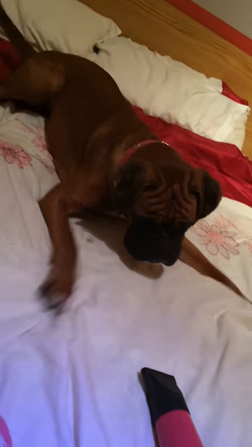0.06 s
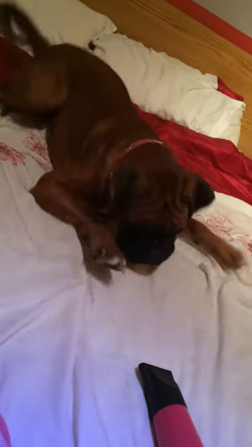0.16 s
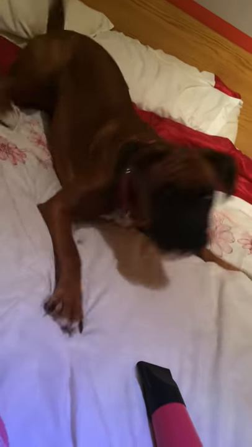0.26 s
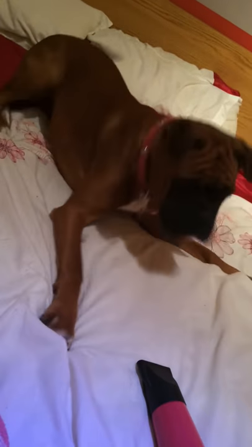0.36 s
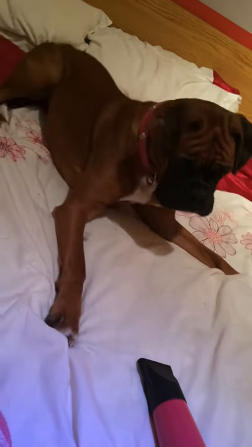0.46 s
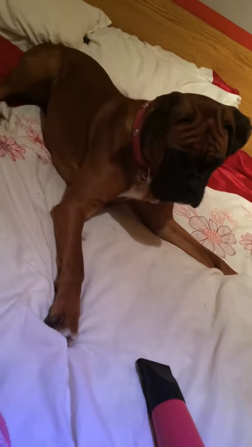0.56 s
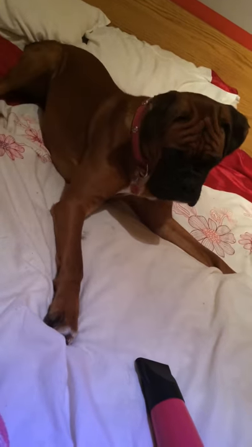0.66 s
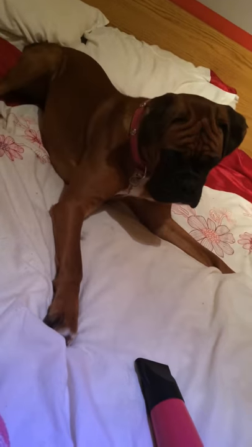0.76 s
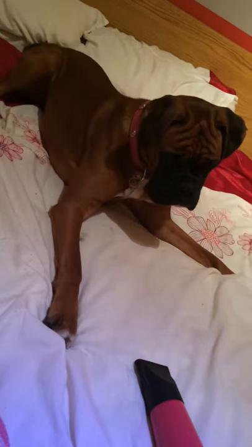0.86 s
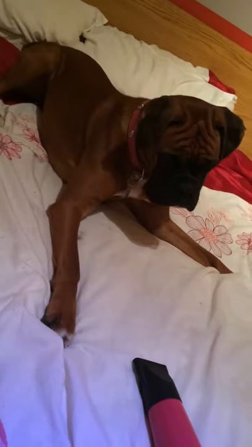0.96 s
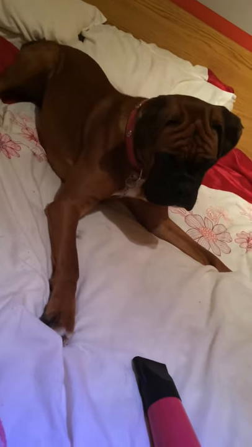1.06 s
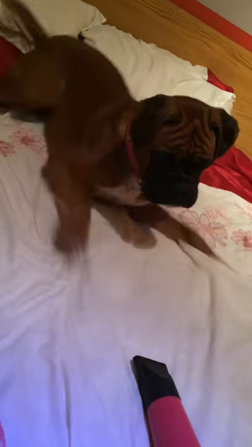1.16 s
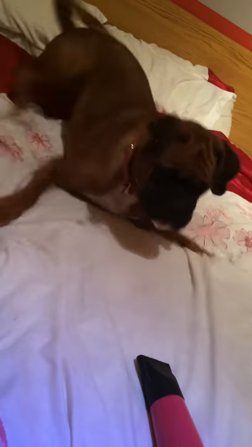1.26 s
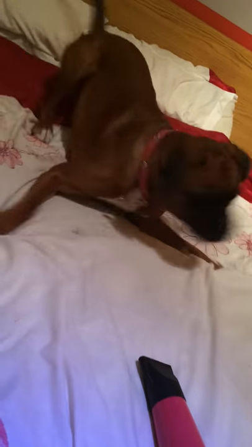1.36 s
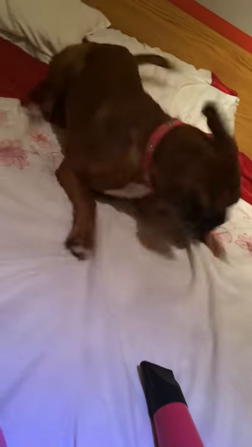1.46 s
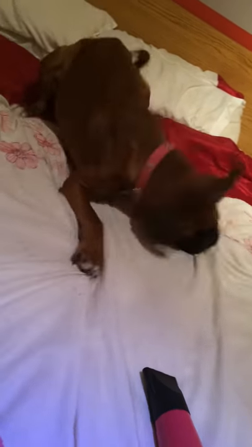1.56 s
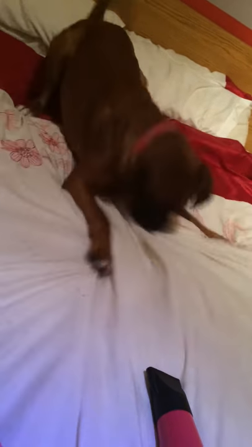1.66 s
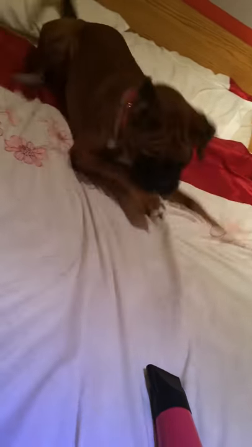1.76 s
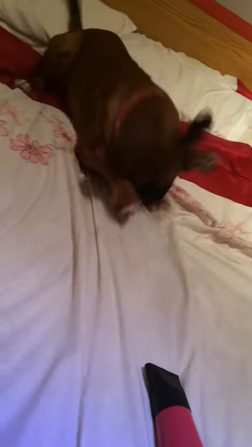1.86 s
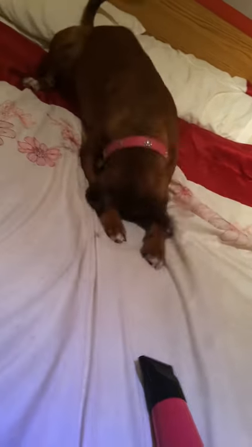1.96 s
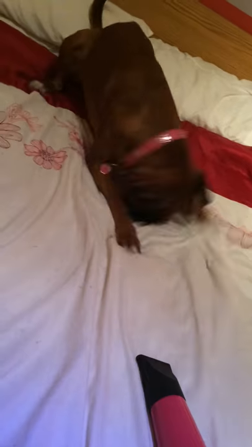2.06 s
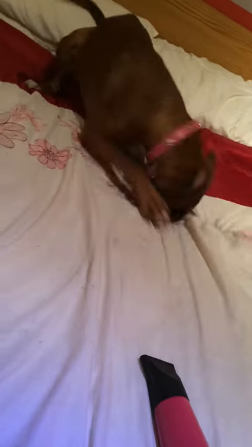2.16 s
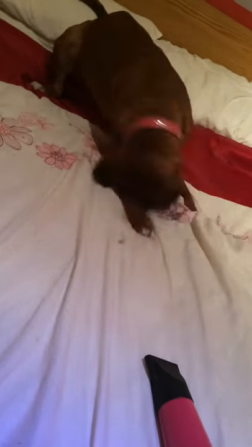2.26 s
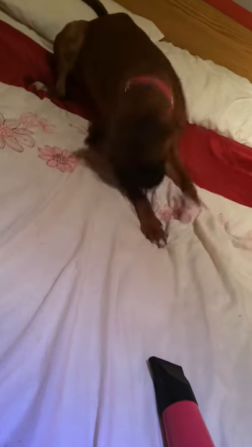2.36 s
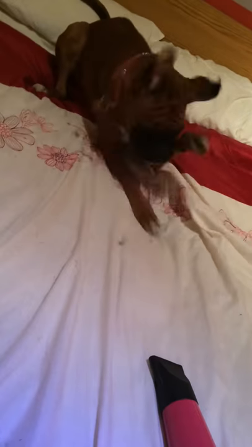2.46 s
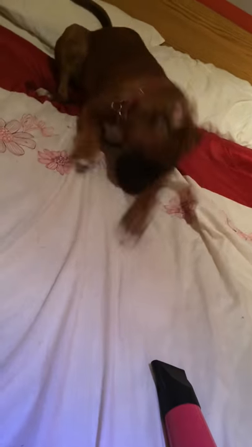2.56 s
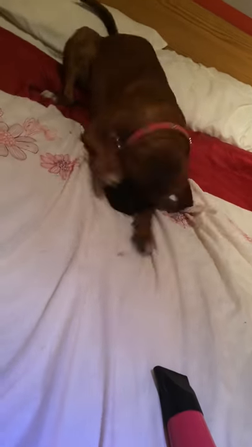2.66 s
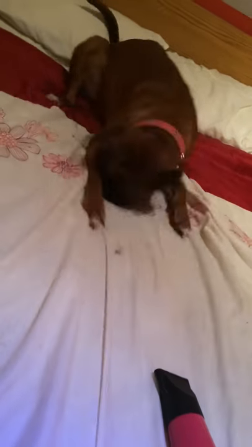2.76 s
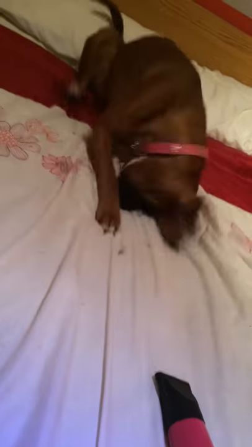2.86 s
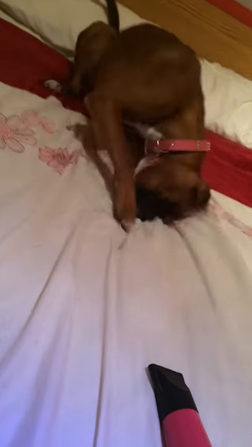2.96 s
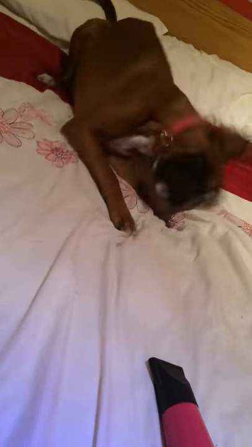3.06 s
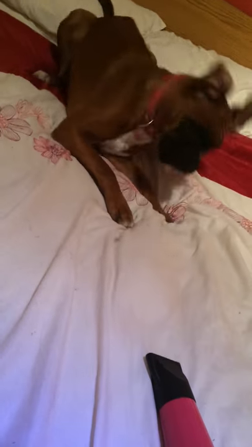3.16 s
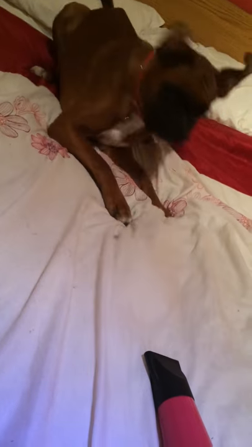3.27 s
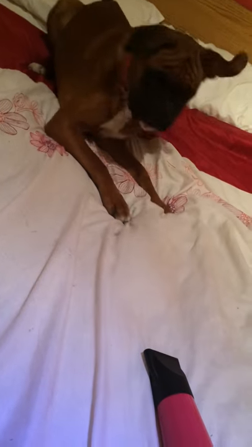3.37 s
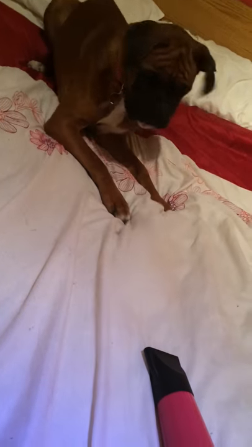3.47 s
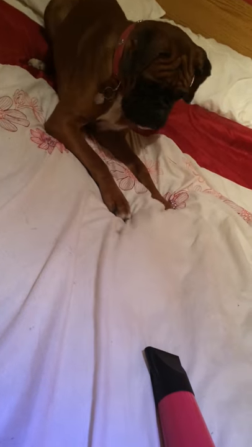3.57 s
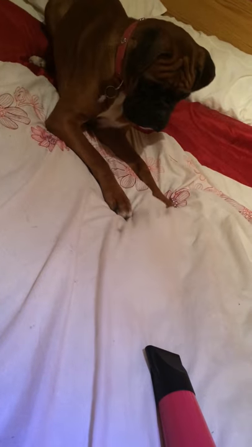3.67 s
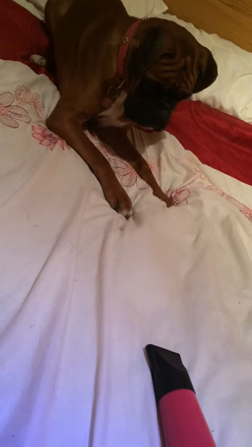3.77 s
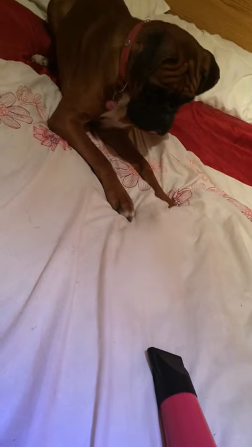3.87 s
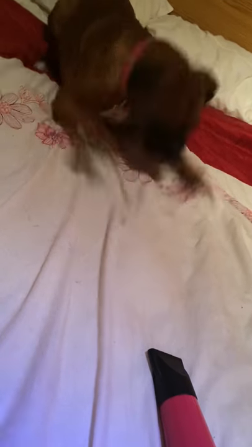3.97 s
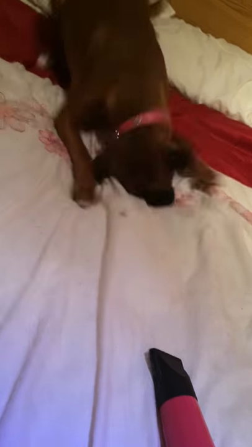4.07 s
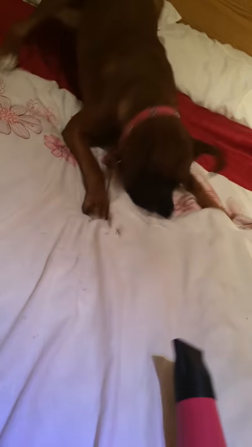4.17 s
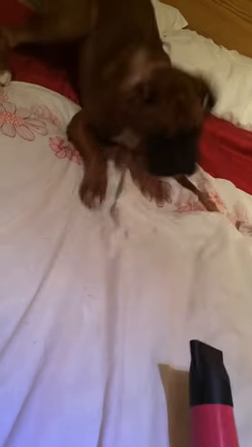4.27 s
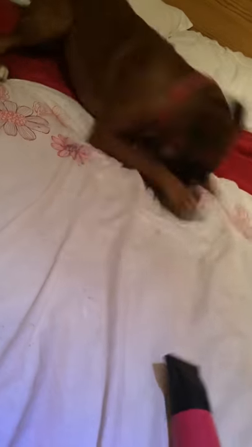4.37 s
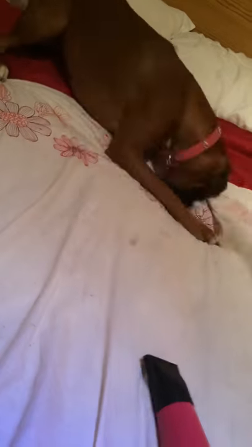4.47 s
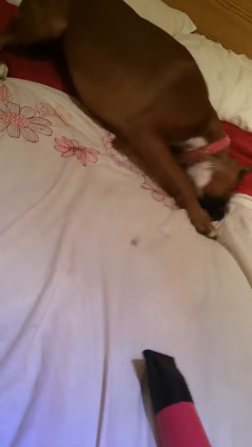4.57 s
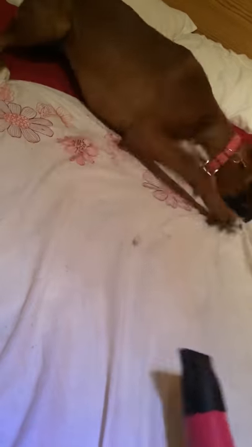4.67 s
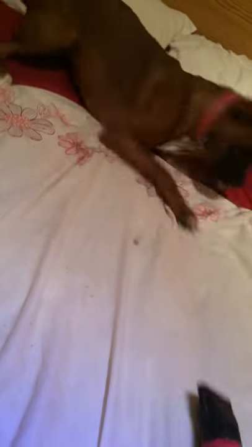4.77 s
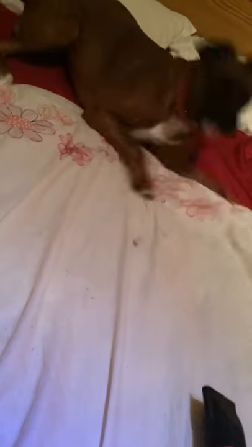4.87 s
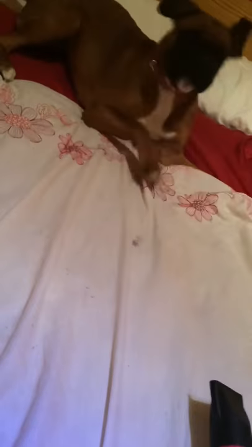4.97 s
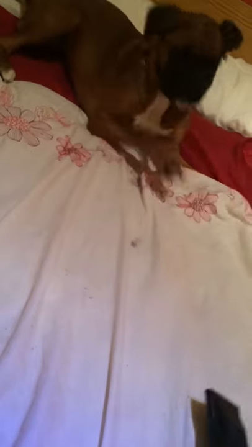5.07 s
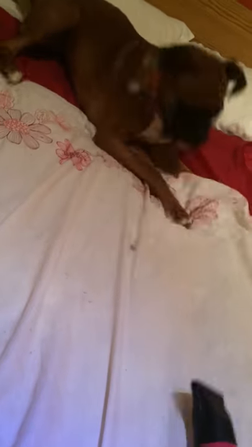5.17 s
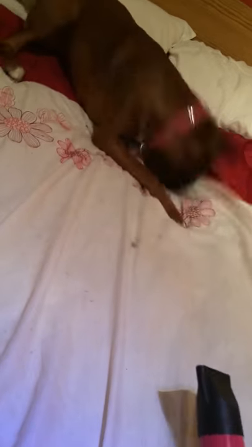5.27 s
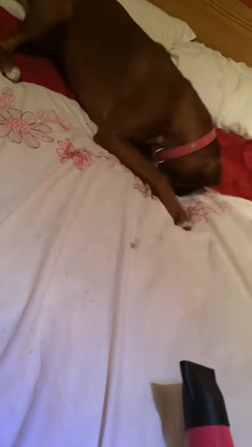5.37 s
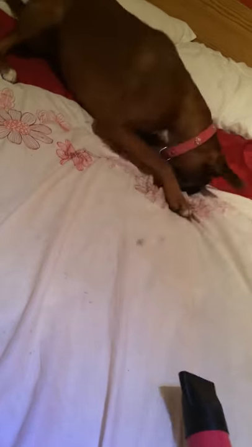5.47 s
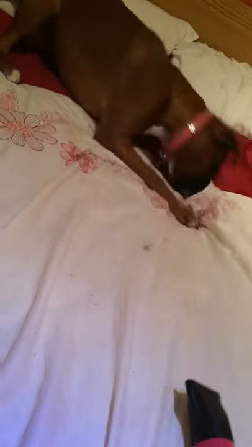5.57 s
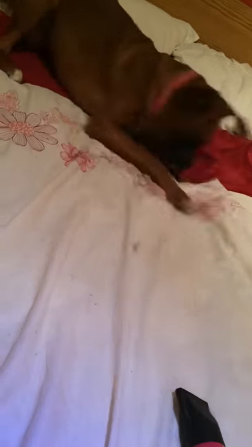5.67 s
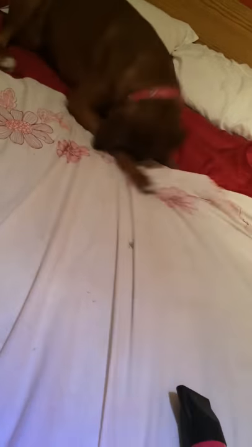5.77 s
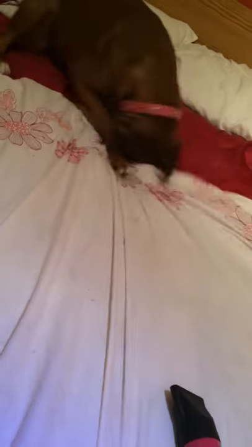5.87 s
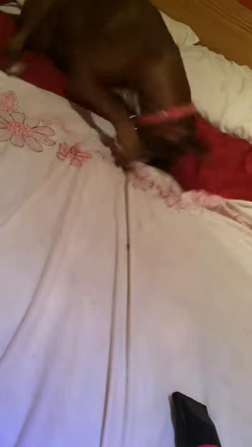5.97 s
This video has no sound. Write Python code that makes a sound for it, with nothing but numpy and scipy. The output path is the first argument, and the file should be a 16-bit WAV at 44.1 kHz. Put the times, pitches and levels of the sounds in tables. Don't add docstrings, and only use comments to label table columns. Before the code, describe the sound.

In a quiet small bedroom, sheets rustle briefly as a large dog shifts, then it gives one short, rough bark that jumps up in pitch and rings off the walls. After a short pause a plastic switch snaps sharply and a hair dryer spins up, settling into a steady airy roar with hiss and a thin high whine. Paws thud softly on the mattress beneath it. Close phone microphone.

```python
import sys
import numpy as np
from scipy import signal
from scipy.fft import rfft, irfft
from scipy.io import wavfile
from scipy.ndimage import uniform_filter1d

SR = 44100
rng = np.random.default_rng(int(sys.argv[2]) if len(sys.argv) > 2 else 0)


def transcribe(u):
    v = np.clip(np.atleast_2d(u).T, -1, 1)
    q = np.round(v * 32767).astype(np.int16)
    wavfile.write(sys.argv[1], SR, q)


def volts_from_decibels(level):
    exponent = np.asarray(level, float) / 20
    return 10 ** exponent


N = 265041
T = np.arange(N) / SR
ON_S = 1.16

# time in [s], whine level in [dB], nearness in [dB].
HAND = [(1.55, -34.5, 0.5), (1.85, -36, 0), (2.2, -30, -0.5), (2.5, -34.5, -2.5), (3.19, -33, -2),
        (3.73, -37, -2), (4.2, -37.5, -2), (5.1, -39.5, -2.5), (5.35, -36.5, -2.5), (5.6, -39.5, -2),
        (6.02, -39.5, -2.5)]


def evened(x):
    return x / np.sqrt(np.mean(x ** 2) + 1e-20)


def read(points, hz):
    f, value = np.transpose(points)
    return np.interp(np.log(hz + 1), np.log(f + 1), value)


def curves(rows, t):
    s, *columns = np.transpose(rows)
    return [np.interp(t, s, column) for column in columns]


def add(mix, s, sound):
    part = mix[round(s * SR):][:len(sound)]
    part += sound[:len(part)]


def bump(t, middle, half):
    return np.exp(-((t - middle) / half) ** 2)


def highpass(x, hz):
    return signal.sosfilt(signal.butter(2, hz, "high", fs=SR, output="sos"), x)


def resonate(x, hz, width):
    turn = np.exp(2j * np.pi * np.cumsum(hz * np.ones(len(x))) / SR)
    r = np.exp(-np.pi * width / SR)
    return 2 * (turn * signal.lfilter([1 - r], [1, -r], x / turn)).real


def twice(x, hz, width):
    return resonate(resonate(x, hz, width), hz, width)


def noise(spectrum, patchy_db, skirt_db=60):
    hz = np.fft.rfftfreq(2048, 1 / SR)
    a, b, patches = rng.standard_normal((N // 512 + 5, 1025, 3)).T
    patches = evened(uniform_filter1d(uniform_filter1d(patches, 20, 0), 6, 1))
    outside = np.log2(np.maximum(np.maximum(spectrum[0][0] / (hz + 1), hz / spectrum[-1][0]), 1))
    color_db = read(spectrum, hz) - 4 * skirt_db * outside
    z = (a + 1j * b) * volts_from_decibels(color_db[:, None] + patchy_db * patches)
    return evened(signal.istft(z, nperseg=2048, noverlap=1536)[1][:N])


def room(x, wet_db=-5, late_db=-44, late_t60=1.1):
    # frequency in [Hz], time to die away by 60 dB in [s].
    decay = [(120, 0.4), (240, 0.1), (500, 0.21), (1400, 0.24), (3000, 0.3), (8000, 0.26), (15000, 0.25)]
    # frequency in [Hz], level in [dB].
    far_tail = [(250, -31.5), (520, -1), (800, -17), (1300, 5), (1750, -6), (2200, -22)]
    taps = np.zeros(SR)
    at = np.arange(200, SR - 20, 20)
    taps[at + rng.integers(0, 20, len(at))] = rng.choice([-1., 1.], len(at))
    hz, t, z = signal.stft(taps, SR, nperseg=256)
    early = volts_from_decibels(-60 * t / read(decay, hz)[:, None])
    late = volts_from_decibels(late_db + read(far_tail, hz)[:, None] - 60 * t / late_t60)
    tail = signal.istft(z * (early + late), SR, nperseg=256)[1]
    return x + volts_from_decibels(wet_db) * signal.fftconvolve(x, tail / np.linalg.norm(tail))[:N]


def standing_waves(x, level_db=3):
    # pitch in [Hz], level in [dB], time to die away by 60 dB in [s].
    modes = [(428, -9.5, 0.27), (520, -20, 0.18), (629, -5.5, 0.17), (1140, -0.5, 0.28), (1253, 0.5, 0.24),
             (1418, -4.5, .18), (1640, -4.5, .22), (1735, -8, .2), (515, -39, 0.8), (1136, -37, .8),
             (1260, -39, .8), (1393, -40.5, .8), (1650, -39.5, .9)]
    t = np.arange(SR // 2) / SR
    rings = sum(volts_from_decibels(db - 60 * t / t60) * np.sin(2 * np.pi * hz * t) for hz, db, t60 in modes)
    return volts_from_decibels(level_db) / 500 * signal.fftconvolve(x, rings)[:N]


def background():
    # frequency in [Hz], level in [dB per Hz].
    color = [(18, -32.5), (30, 0), (133, -2.5), (187, 0), (379, -13), (518, -4), (673, -17), (1260, -15),
             (1820, -17.5), (13300, -25.5), (15500, -26.5)]
    return volts_from_decibels(-71.5) * noise(color, 1.2)


def bedding():
    # time in [s], level in [dB].
    drag = [
        (0, -87),
        (.1, -71),
        (.145, -71),
        (.17, -62),
        (.206, -67),
        (.23, -64),
        (.27, -77),
    ]
    # frequency in [Hz], level in [dB per Hz].
    cloth_color = [(530, -28), (900, 1), (1640, -7), (2040, -3), (3000, -19), (3710, 2), (5350, -14),
                   (6360, 0), (9000, -10), (11700, -38), (19800, -120)]
    # time in [s], level in [dB], half length in [s].
    sinking = [
        (0.166, -51, 0.0091),
        (0.204, -54, .008),
        (.232, -58, .014),
        (0.277, -61, .02),
    ]
    # start in [s], peak in [dB], length in [s].
    fabric_snaps = [
        (.2185, -47, .004),
        (0.225, -46, .004),
        (.233, -51, .004),
        (0.238, -51, .004),
        (0.256, -43, .005),
        (.263, -50, .003),
    ]
    hiss_db, = curves(drag, T)
    top_db = -4 + 7 * np.clip((T - 0.21) / .06 + .5, 0, 1)
    weight = volts_from_decibels(0.34 * hiss_db - 45) + sum(volts_from_decibels(db) * bump(T, s, half) for s, db, half in sinking)
    rumble = noise([(60, 0), (170, 6), (350, -13), (900, -15)], 2.5)
    sheen = noise([(1500, -4), (9000, -3), (15000, -3)], 1.3)
    snaps = sum(volts_from_decibels(db - 11) * bump(T, s + length / 2, 0.39 * length) for s, db, length in fabric_snaps)
    cloth = volts_from_decibels(hiss_db) * noise(cloth_color, 2.7) + (volts_from_decibels(hiss_db + top_db - 3) + snaps) * sheen
    return np.clip((.3 - T) / .02, 0, 1) * (cloth + weight * rumble)


def paws():
    # time in [s], peak in [dB], pitch in [Hz], time to die away by 60 dB in [s].
    steps = [(1.391, -42, 94, 0.3), (1.45, -51, 40, .2), (1.679, -38, 107, 0.18), (1.73, -46, 50.4, 0.18),
             (2.05, -38, 74.6, .25), (2.049, -29.5, 158, 0.084), (2.72, -44, 60, 0.24),
             (2.874, -37, 79, 0.19), (4.18, -47.5, 69.6, 0.77), (4.561, -33, 142, .13),
             (5.245, -46, 80, .25), (5.42, -48, 71, 0.15), (5.949, -48, 60.3, .2), (.5, -67, 69.6, .4)]
    out, t = np.zeros(N), np.arange(SR // 2) / SR
    shakes = rng.standard_normal((len(steps), len(t)))
    for (s, db, hz, t60), shake in zip(steps, shakes):
        sag = np.cumsum(hz * (0.94 + 0.38 * np.exp(-t / 0.036))) / SR
        rumble = evened(resonate(resonate(shake, hz, 1.8 * hz), hz, 2.0 * hz))
        envelope = volts_from_decibels(db + 7.0 - 60 * t / t60) * (1 - np.exp(-t / 0.013))
        add(out, s, envelope * (np.sin(2 * np.pi * sag) + rumble))
    return out


def clicks():
    # time in [s], peak in [dB], level of the low push in [dB].
    snaps = [
        (0.032, -63, -10),
        (1.113, -39, -12),
        (1.1156, -48, 0),
        (1.1474, -57, -4),
        (1.1593, -16.5, -22),
        (1.17, -18.5, -25),
    ]
    # pitch in [Hz], level in [dB], time to die away by 60 dB in [s].
    plastic = [(720, -14, 0.019), (1420, -13, 0.012), (1930, 2, 0.0065), (4140, 4.5, 0.0065),
               (6500, 4, 0.0061), (8150, -1, .006), (11400, -16, .005), (14000, -16, .004)]
    out, t = np.zeros(N), np.arange(1200) / SR
    cracks = rng.standard_normal((len(snaps), len(t))) * volts_from_decibels(-1.0 - 60 * t / 0.0099)
    spreads = rng.uniform(.93, 1.07, (len(snaps), len(plastic)))
    for (s, db, low_db), crack, spread in zip(snaps, cracks, spreads):
        ring = sum(volts_from_decibels(ring_db - 60 * t / t60) * np.sin(2 * np.pi * hz * k * t)
                   for (hz, ring_db, t60), k in zip(plastic, spread))
        ring = (ring + crack) * (1 - np.exp(-t / 0.00037))
        push = volts_from_decibels(low_db - 60 * t / 0.028) * np.sin(2 * np.pi * 420 * t)
        add(out, s, volts_from_decibels(db) * (ring / abs(ring).max() + push))
    return out


def between(shut, wide, opening):
    return shut + (wide - shut) * np.clip(opening, 0, 1)


def throat(t, hz, opening, rough, jitter, noises):
    halves = np.clip(.03 + 0.9 * bump(t, .34, .016), 0, 1)
    turns = np.cumsum(hz * (1 + .14 * rough * jitter)) / SR
    folds = sum(np.cos(np.pi * k * turns) * (halves if k % 2 else 1) for k in range(1, 24))
    puffs, *eddies = evened((rough + np.exp(-(turns % 1) / 0.32)) * noises)
    drive = (1 - rough) * folds * np.sqrt(hz / SR) * 2 + rough * puffs
    deep = drive - 0.18 * rough * puffs
    chest = (1 - .45 * halves) * twice(deep, hz, 300)
    chest += halves * .6 * twice(drive, hz / 2, 150)
    chest += 0.74 * rough * twice(puffs, 0.85 * hz, 150)
    high_hz = between(894, 1257, opening)
    mouth = twice(drive, high_hz, 380) - 0.69 * twice(drive, 1.33 * high_hz, 430)
    level = lambda x: x / np.sqrt(uniform_filter1d(x ** 2, 900) + 1e-12)
    return level(chest) - volts_from_decibels(between(-28, 4, opening)) * level(mouth), eddies


def breath(t, effort_db, opening, spurts, eddies):
    # level with the mouth shut in [dB], level open in [dB], share of effort.
    strength = [(-41, -18.5, 1), (-40, -39, .7), (-34.5, -31, 0.55)]
    # frequency in [Hz], width in [Hz], level in [dB].
    rasp_bands = [(3500, 900, -4.5), (4850, 1100, 2), (7240, 380, 4.5), (8540, 760, 2), (10200, 900, -1.5),
                  (12500, 4000, -12.5)]
    # middle in [s], half length in [s], pitch in [Hz], glide in [Hz per s], level in [dB].
    whistles = [
        (.315, .013, 3620, 0, -40),
        (.355, .01, 4950, -8000, -35),
        (.382, .024, 3850, -42000, -32),
        (.376, .009, 6250, 20000, -37),
        (.42, .012, 4500, -15000, -42),
    ]
    mid_db, upper_db, rasp_db = (between(shut_db, open_db, opening) + share * effort_db
                                 for shut_db, open_db, share in strength)
    rasp_db = rasp_db + 2.5 * spurts
    rasp = sum((-1) ** k * volts_from_decibels(db) * resonate(eddies[0], hz, width)
               for k, (hz, width, db) in enumerate(rasp_bands))
    out = volts_from_decibels(rasp_db) * evened(highpass(rasp, 3000))
    for s, half, whistle_hz, glide, db in whistles:
        out += volts_from_decibels(db) * bump(t, s, half) * evened(twice(eddies[1], whistle_hz + glide * (t - s), 270))
    out += volts_from_decibels(mid_db) * evened(twice(eddies[2], 2300, 910))
    out += volts_from_decibels(upper_db) * evened(twice(eddies[3], 4400, 900))
    return out


def bark():
    # time in [s], effort in [dB], pitch in [Hz], mouth opening from 0 to 1.
    push = [
        (.28, -38.5, 203.4, 0),
        (.283, -28, 208, 0.04),
        (.306, -27, 269.6, 0.4),
        (.317, -18.5, 466.7, 0.5),
        (.333, -11.5, 460.3, .75),
        (.347, -17.5, 477.6, .95),
        (.386, -12.5, 512.3, 1),
        (.428, -17.5, 547.3, 0.96),
        (.455, -40, 520, 0.94),
    ]
    t = np.arange(push[0][0], .48, 1 / SR)
    effort_db, hz, opening = curves(push, t)
    rough = between(.03, .65, opening)
    chance = rng.standard_normal((SR // 2, 6))[:len(t)].T
    jitter = evened(uniform_filter1d(chance[0], 120))
    spurts = evened(uniform_filter1d(chance[0], 300))
    voice, eddies = throat(t, hz, opening, rough, jitter, chance[1:])
    voice = volts_from_decibels(effort_db - 4.0) * voice + breath(t, effort_db, opening, spurts, eddies)
    out = np.zeros(N)
    add(out, t[0], highpass(voice, 90))
    return out


def fan_speed():
    since = np.maximum(T - ON_S, 0)
    slow_share, slow_s, quick_s = .6, .162, .092
    missing = slow_share * np.exp(-since / slow_s) + (1 - slow_share) * bump(since, 0, quick_s)
    return np.maximum(1 - missing, 1e-3)


def motor():
    # time in [s], blade rate at full speed in [Hz].
    full_speed = [(1.85, 2800), (2.2, 2793), (3.19, 2792), (3.73, 2782), (5.1, 2773), (6.02, 2781)]
    (full_hz,), (blade_db, _) = curves(full_speed, T), curves(HAND, T)
    blade_hz = full_hz * fan_speed()
    waver = evened(resonate(rng.standard_normal(N), blade_hz, 49))
    whine = np.sqrt(2) * np.sin(2 * np.pi * np.cumsum(blade_hz) / SR) + 0.17 * waver
    through = np.clip((fan_speed() - .875) / (.95 - .875), 0, 1) ** 2
    hum_hz, hum_db = 100.3, -55.5
    unsteady = evened(resonate(resonate(rng.standard_normal(N), hum_hz, 5.3), hum_hz, 16))
    hum = unsteady * 0.48 + np.sin(2 * np.pi * hum_hz * T)
    return volts_from_decibels(blade_db) * through * whine + volts_from_decibels(hum_db) * hum * (T > ON_S)


def dryer():
    # level at full speed in [dB],
    # power of fan speed, share of nearness, jolt at the start in [dB].
    air_layers = [(-29.5, 2.23, 0.69, -55), (-28.5, 2.3, 1.13, -44.5), (-30.5, 2.55, 1.24, -48),
                  (-29, 3.1, 1.62, -62)]
    # frequency in [Hz], level in [dB per Hz].
    duct_color = [(18, -68), (30, -42), (65, -25.5), (91, -33), (123, -18.5), (243, -10), (461, 0.5),
                  (649, -6.5), (707, -7), (759, -16.5), (900, -23), (1170, -51), (1980, -120)]
    mid_color = [(480, -30), (820, -7.5), (871, -16), (920, -2.5), (1060, -2), (1230, -1), (1500, -3),
                 (1670, -3), (1910, -3.5), (2150, -3), (2510, -7), (2650, -6), (2700, -2), (3510, -14.5),
                 (5940, -120)]
    nozzle_color = [(1710, -57), (2900, -5), (2930, -11), (3080, -8.5), (4260, -8), (5460, -11.5),
                    (7500, -12.5), (9750, -30), (16500, -120)]
    top_color = [(4410, -17.5), (7500, -5), (9270, -3), (13800, -2), (14700, -4), (15300, -3.5)]
    # pitch in [Hz], width in [Hz], level in [dB].
    casing = [(469, 55, -39), (553.5, 8.9, -39.5), (700, 14, -48), (1066, 18, -42.5), (1623, 59, -42),
              (2083, 40, -46), (4340, 46, -53)]
    since, near_db = np.maximum(T - ON_S, 0), curves(HAND, T)[1]
    gains = [volts_from_decibels(db + share * near_db) * fan_speed() ** power + volts_from_decibels(jolt_db - 60 * since / 0.18)
             for db, power, share, jolt_db in air_layers]
    gains[0] = gains[0] * volts_from_decibels(13.5 * np.exp(-since / 0.21))
    layers = zip(gains, (duct_color, mid_color, nozzle_color, top_color), (1.12, 1.24, 1.1, 0.82))
    air = sum(gain * noise(color, patchy_db) for gain, color, patchy_db in layers)
    eddies = rng.standard_normal(N) * gains[1] * volts_from_decibels(31.0)
    for hz, width, db in casing:
        ringing = signal.lfilter(*signal.iirpeak(hz, hz / width, SR), eddies)
        air += volts_from_decibels(db) * ringing * np.sqrt(SR / np.pi / width)
    gusts = evened(uniform_filter1d(uniform_filter1d(rng.standard_normal(N), 2500), 1500))
    return np.clip(since / 0.016, 0, 1) * air * volts_from_decibels(0.12 * gusts)


def scene():
    dog = bark()
    echoing = room(dog) + standing_waves(dog) + room(clicks(), wet_db=-13) + room(dryer(), wet_db=-14.0)
    return np.tile(echoing + motor() + paws() + bedding() + background(), (2, 1))


def side_hiss():
    # middle in [s], lowest frequency in [Hz], highest frequency in [Hz], level in [dB].
    puffs = [(2.77, 13800, 15300, -40), (3.56, 11000, 13300, -38), (3.93, 9700, 11200, -39),
             (4.44, 5160, 6500, -41), (4.44, 8300, 9700, -43), (4.44, 11000, 13300, -42),
             (4.86, 9600, 11200, -43), (4.975, 4200, 5200, -43), (5.115, 9600, 11200, -44),
             (5.28, 11700, 13300, -42), (5.465, 4570, 6300, -41), (5.72, 8900, 10400, -41),
             (5.72, 12400, 14000, -43)]
    side, size = np.zeros(N), 2048
    hz = np.fft.rfftfreq(size, 1 / SR)
    swell = np.sin(np.pi * np.arange(size) / size) ** 2
    for s, low_hz, high_hz, db in puffs:
        band = irfft(rfft(rng.standard_normal(size)) * (hz > low_hz) * (hz < high_hz))
        add(side, s - size / 2 / SR, volts_from_decibels(db) * evened(band) * swell)
    return side


def top_cut(x):
    return signal.sosfilt(signal.butter(12, 16540, fs=SR, output="sos"), x)


def record(dry):
    side = side_hiss()
    squeezed = 0.97 * np.tanh(dry / 0.96)
    lowpass = signal.firwin(301, 15330, window=("kaiser", 9), fs=SR)
    cut = signal.oaconvolve(squeezed, lowpass[None], "same")
    return top_cut(cut + np.array([side, -side]))


dry = scene()
out = record(dry)
transcribe(out)
```